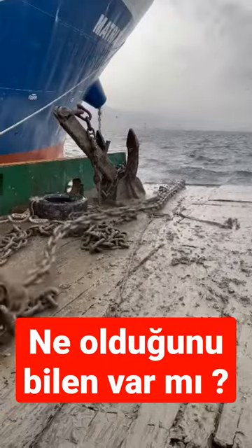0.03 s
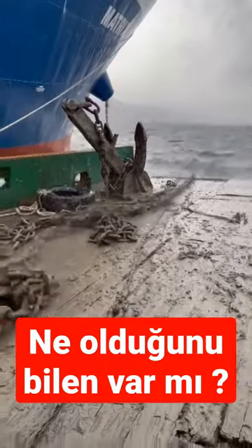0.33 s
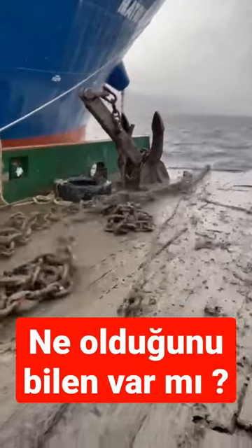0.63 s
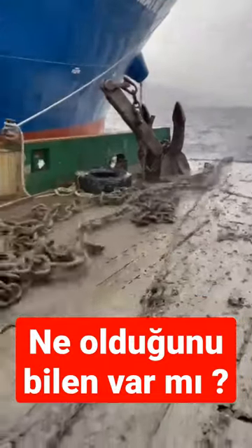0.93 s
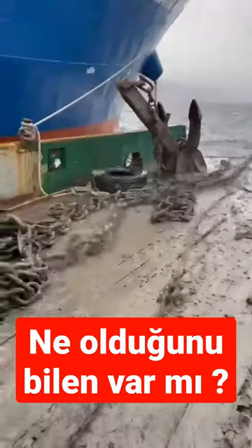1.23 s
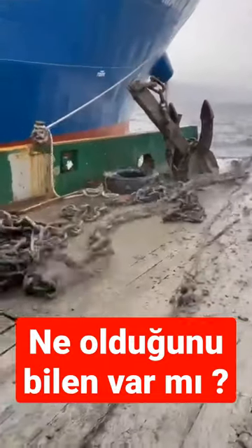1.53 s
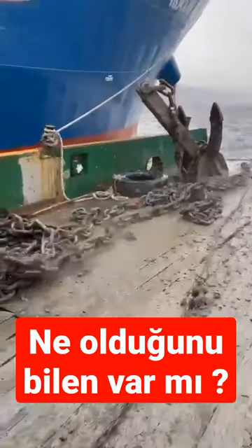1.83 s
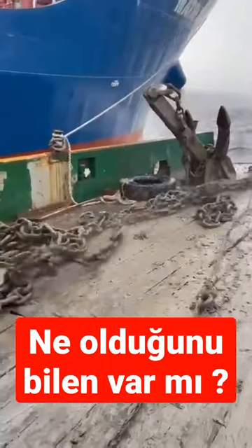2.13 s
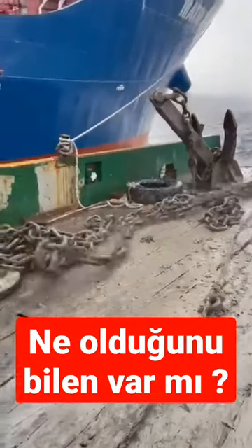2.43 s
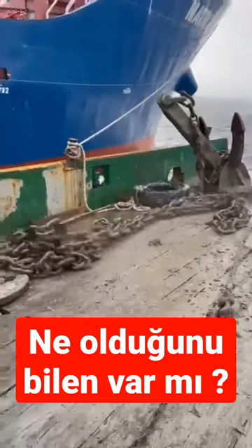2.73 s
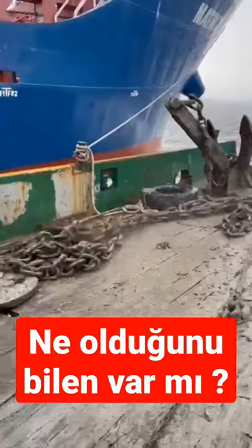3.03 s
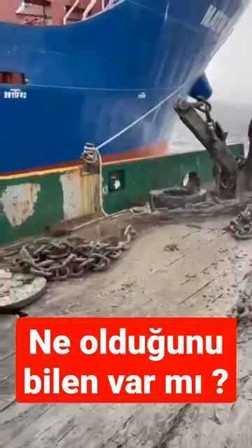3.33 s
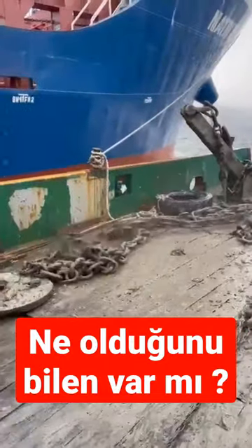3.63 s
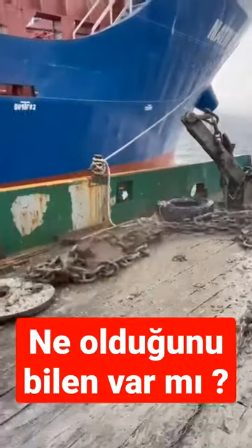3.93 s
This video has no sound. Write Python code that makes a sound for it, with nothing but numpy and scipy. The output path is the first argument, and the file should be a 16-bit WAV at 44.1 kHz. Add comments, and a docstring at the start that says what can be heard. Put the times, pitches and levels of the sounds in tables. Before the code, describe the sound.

Outdoors on a ship's deck, a heavy chain runs out fast a few metres from the microphone. Its links clank and ring without a break, scraping and thumping on wooden boards, with a short echo off a nearby hull.

```python
"""A heavy anchor chain races over a ship's wooden deck and out to sea, a few metres from the microphone.
Hundreds of steel links a second strike each other and ring briefly; loops torn from the heap clash in
bursts, knock on the planks and thud into the deck. The hull alongside throws the rattle back.
Heard on deck, in the open air, through a handheld stereo microphone."""
import sys
import numpy as np
from scipy import signal
from scipy.fft import rfft, irfft, next_fast_len
from scipy.io import wavfile
from scipy.ndimage import uniform_filter1d

SR = 44100
rng = np.random.default_rng(int(sys.argv[2]) if len(sys.argv) > 2 else 0)


def to_wav(s):
    """Save 16-bit WAV."""
    ch = np.atleast_2d(s).T  # columns
    pcm = np.round(np.clip(ch, -1, 1) * 32767)  # PCM
    wavfile.write(sys.argv[1], SR, pcm.astype(np.int16))


N = 176400
START_S = 0.11  # the rattle sets in at once

# Levels in the tables are relative; each source adds its own gain.
# how hard the running chain is shaken: time_s, level_db
SHAKE = [(.107, -9.5), (.15, -22.5), (.22, -22), (.3, -29.5), (.7, -28), (.92, -26), (1.05, -30.5),
         (1.11, -26), (1.21, -28), (1.3, -22.5), (1.6, -24), (2.0, -24), (2.26, -25), (2.33, -28.5),
         (2.42, -25), (2.51, -28), (2.58, -35), (2.65, -25.5), (2.72, -28.5), (2.85, -20), (2.98, -25.5),
         (3.12, -19.5), (3.28, -25), (3.42, -19.5), (3.55, -24), (3.68, -18.5), (3.77, -28), (3.91, -23.5),
         (4, -17)]
# loops of chain clashing together: start_s, level_db
CLASHES = [(0.106, -16), (0.124, -25.5), (0.148, -17), (0.833, -21.5), (1.064, -17.5), (1.131, -23),
           (1.334, -22.5), (1.615, -14), (1.697, -16), (1.844, -18.5), (1.958, -18), (2.061, -19.5),
           (2.15, -19), (2.243, -17), (2.38, -21), (2.599, -21), (2.759, -20), (2.827, -16), (3.036, -17.5),
           (3.344, -16.5), (3.487, -19.5)]
# ring of a struck link: pitch_hz, level_db, t60_s
LINK_MODES = [(1889, -11, 0.061), (2530, 3, 0.13), (2672, 1.5, 0.099), (2990, -13, 0.042), (5318, -9, 0.1),
              (5954, -5.5, 0.077), (6510, -12, 0.11), (6908, -13, 0.12)]
# single links cracking hard: start_s, level_db, pitch_hz (unused)
HARD_CRACKS = [(.124, -9.5, 2600), (.689, -25, 2530), (1.064, -13.5, 2590), (1.081, -14.5, 2600),
               (1.351, -22, 2610), (1.525, -20.5, 2620), (1.632, -9, 2610), (1.697, -15, 2600),
               (1.845, -13, 2520), (2.063, -13, 2670), (2.157, -15.5, 2690), (2.833, -15, 2600),
               (3.018, -14, 2680), (3.151, -16, 2540), (3.386, -12, 2530), (3.815, -11, 2590),
               (3.929, -13, 2520)]
# spectrum of a steel-on-steel crack: frequency_hz, level_db
CRACK_COLOUR = [(300, -16), (1000, 1.5), (1900, 4), (2200, 2.5), (2800, 17), (3500, 0), (4300, -2.5),
                (4900, -8), (5300, -6.5), (7100, -10), (7700, -6.5), (9000, -38), (11500, -46)]
# how hard the links meet, as the gain of their cracks: time_s, gain_db
BITE = [(1.1, -8), (1.65, -12.5), (2.6, -10), (3.45, -7)]
# ring of a link swinging free: pitch_hz, level_db, t60_s
FREE_MODES = [(1948, -11, 0.12), (2615, 9, 0.11), (2796, -2, 0.1), (5900, -7, 0.07)]
# ring of a glancing blow: pitch_hz, level_db, t60_s
GLANCE_MODES = [(3270, -1.5, 0.12), (3828, -9, 0.15), (4333, -6, 0.12)]
# ring of a link caught on its edge: pitch_hz, level_db, t60_s
EDGE_MODES = [(8600, -2.5, 0.096), (11060, -11, .12)]
# weight of chain dragging on the deck: time_s, level_db
DRAG = [(.2, 1.5), (.33, -3.5), (.6, 2), (1.2, 0), (1.55, 2.5), (2.2, 3), (3.0, -0.5), (3.55, 5), (4, 0)]
# lengths of chain falling over a beam: start_s, level_db, pitch_hz
THUDS = [(0.112, -29.5, 101.4), (0.75, -40.5, 123), (1.105, -32, 131), (1.271, -35, 129),
         (1.532, -33.5, 105), (2.025, -32.5, 120), (2.131, -28, 138), (2.433, -30, 118),
         (2.535, -34, 112.5), (2.83, -28.5, 146.4), (3.085, -30.5, 140.6), (3.478, -32, 115)]
# spectrum of the deck's boom: frequency_hz, level_db
DECK_COLOUR = [(35, -41), (52, -11), (80, 2.5), (125, -0.5), (200, -4), (300, -11.5), (900, -48)]
# resonances of the beams under the deck, retuned by each thud: pitch_hz, level_db, t60_s
BEAM_MODES = [(86, -9, 0.18), (140, 4, 0.2)]
# links slapping a board: start_s, level_db, pitch_hz
KNOCKS = [(0.117, -31.5, 399), (0.913, -28, 582), (1.062, -28.5, 406), (1.508, -23.5, 640),
          (1.683, -30, 665), (1.849, -28.5, 625), (2.18, -31, 401), (2.456, -28.5, 487),
          (3.095, -26.5, 528), (3.342, -31.5, 554), (3.812, -26, 556)]
# spectrum of scraped planks: frequency_hz, level_db
PLANK_COLOUR = [(60, -44), (200, -4), (350, 7), (700, 5), (1100, 2), (1800, -2), (3000, -1), (6000, -83.5)]
# resonances of a slapped board, retuned by each knock: pitch_hz, level_db, t60_s
BOARD_MODES = [(366.5, -6, 0.055), (578.3, 0, 0.072), (657.7, -5.5, 0.11), (739.5, -5, 0.11),
               (921, -7.5, 0.11)]
# how alike the microphone's two ports sound: frequency_hz, likeness_0_to_1
MIC_LIKENESS = [(200, 0.93), (650, 0.26), (1100, 0.45), (1850, 0.94), (2600, 0.45), (4600, 0.074),
                (5800, 0.99)]
# balance between the ports: frequency_hz, left_minus_right_db
MIC_BALANCE = [(220, 2.2), (500, 7), (1200, 4), (1900, 2), (4400, -.5)]
# phase between the ports: frequency_hz, left_lead_rad
MIC_PHASE = [(450, 0), (900, -1.1), (2200, .3), (2800, 2.7), (3700, 6.2), (4200, 6.5), (5550, 12.5),
             (7350, 13.1), (7600, 15.7)]


def amp(db):
    """Decibels to gain."""
    return 10 ** (np.asarray(db) / 20)


def along(points, hz):
    """(Hz, value) points read on a log axis."""
    point_hz, values = np.transpose(points)
    return np.interp(np.log(hz + 1), np.log(point_hz + 1), values)


def curve(rows):
    """(s, value) points drawn out to one value per sample."""
    return np.interp(np.arange(N) / SR, *np.transpose(rows))


def filtered(x, response):
    """x shaped by a frequency response."""
    length = x.shape[-1]
    padded = next_fast_len(length + 8192)
    hz = np.fft.rfftfreq(padded, 1 / SR)
    return irfft(rfft(x, padded) * response(hz), padded)[..., :length]


def effort(steady_db, bursts, burst_db, attack_s, hold_s, fall_s):
    """Strength of the contacts: a steady part plus bursts that rise, hold and fall away."""
    t = np.arange(N) / SR
    power = amp(steady_db) ** 2
    age = t[:SR // 3]
    shape = np.minimum(age / attack_s, 1) * np.exp(-np.maximum(age - attack_s - hold_s, 0) / fall_s)
    for start_s, level_db, *_ in bursts:
        span = power[round(start_s * SR):][:len(age)]
        span += (amp(level_db + burst_db) * shape[:len(span)]) ** 2
    return np.sqrt(power) * (t > START_S)


def contacts(per_s, spread_db, even_s):
    """Random impacts of uneven size, their power evened out over spans of about even_s."""
    hits = (rng.random(N) < per_s / SR) * amp(spread_db * rng.standard_normal(N))
    window = max(int(even_s * SR), 1)
    power = uniform_filter1d(uniform_filter1d(hits ** 2, window), window)
    return hits / np.sqrt(np.abs(power) + 1e-9)


def blows(rows):
    """One impact for each row, at its time and level."""
    force = np.zeros(N)
    for start_s, level_db, *_ in rows:
        force[round(start_s * SR)] = amp(level_db)
    return force


def struck(force, make_response, bodies):
    """Each impact falls on one of several bodies, each with its own pair of impulse responses."""
    target = rng.integers(bodies, size=N)
    out = np.zeros((2, N))
    for body in range(bodies):
        response = make_response()
        response /= np.sqrt(np.sum(response ** 2) / 2)
        hits = force * (target == body)
        out += signal.oaconvolve(hits[None], response, axes=1)[:, :N]
    return out


def ringing(modes, scatter, uneven_db):
    """One struck body: decaying modes, each off in pitch (scatter, a fraction) and level by chance."""
    t = np.arange(SR // 5) / SR
    hz, db, t60 = np.transpose(modes)[:, :, None]
    detune, level = rng.standard_normal((2, len(modes), 1))
    phase = rng.uniform(0, 2 * np.pi, (2, len(modes), 1))
    rise = 1 - np.exp(-(t * hz / 0.85) ** 2)  # a mode swells over 0.85 of a cycle
    decay = np.exp(-np.log(1000) * t / t60)
    tones = np.sin(2 * np.pi * hz * (1 + scatter * detune) * t + phase)
    return np.sum(amp(db + uneven_db * level) * rise * decay * tones, axis=1)


def puff(colour, t60_s):
    """A body without clear modes: a dying burst of coloured noise."""
    t = np.arange(SR // 6) / SR
    noise = filtered(rng.standard_normal((2, len(t))), lambda hz: amp(along(colour, hz)))
    rise = 1 - np.exp(-t / (0.035 * t60_s))
    return noise * rise * np.exp(-np.log(1000) * t / t60_s)


def tuned_strikes(rows, modes, decay_scale, uneven_db):
    """One ringing blow a row, tuned so that the body's main mode lies at the row's pitch."""
    out = np.zeros((2, N))
    main_hz = max(modes, key=lambda mode: mode[1])[0]
    for start_s, level_db, pitch_hz in rows:
        tuned = np.array(modes) * [pitch_hz / main_hz, 1, decay_scale]
        ring = ringing(tuned, 0, uneven_db)
        span = out[:, round(start_s * SR):][:, :ring.shape[1]]
        span += amp(level_db) * ring[:, :span.shape[1]] / np.abs(ring).max()
    return out


def links():
    """Steel on steel: contacts crack and ring the links; some swing free, glance off or catch an edge."""
    strength = effort(curve(SHAKE), CLASHES, burst_db=-1.5, attack_s=0.0012, hold_s=0.012, fall_s=0.02)
    force = contacts(per_s=260, spread_db=1.5, even_s=0.0074) * strength + amp(21) * blows(CLASHES)
    ring = struck(force, lambda: ringing(LINK_MODES, scatter=0.02387, uneven_db=3.5), bodies=72)
    crack_force = force + amp(21.5) * blows(HARD_CRACKS)
    crack = struck(crack_force, lambda: puff(CRACK_COLOUR, t60_s=0.042), bodies=24)
    swings = contacts(per_s=61, spread_db=4, even_s=0.11) * strength
    free = struck(swings, lambda: ringing(FREE_MODES, scatter=0.0402, uneven_db=5), bodies=36)
    glances = contacts(per_s=90, spread_db=3, even_s=0.15) * strength
    clink = struck(glances, lambda: ringing(GLANCE_MODES, scatter=0.07, uneven_db=4), bodies=40)
    edges = contacts(per_s=30, spread_db=6, even_s=0.99) * strength
    chink = struck(edges, lambda: ringing(EDGE_MODES, scatter=0.06, uneven_db=8.5), bodies=12)
    rattle = amp(-2) * ring + amp(curve(BITE)) * crack
    return rattle + amp(-9) * free + amp(-16) * clink + amp(-21) * chink


def deck():
    """The deck booms under the weight of the chain; falling lengths set its beams ringing."""
    weight = effort(curve(DRAG) - 40, THUDS, burst_db=-2.5, attack_s=0.009, hold_s=0.0079, fall_s=0.034)
    force = contacts(per_s=200, spread_db=4, even_s=0.025) * weight
    boom = struck(force, lambda: puff(DECK_COLOUR, t60_s=0.15), bodies=20)
    thud = tuned_strikes(THUDS, BEAM_MODES, decay_scale=0.74, uneven_db=2.5)
    return boom + amp(1.5) * thud


def planks():
    """Links scrape and patter over the boards; a hard slap makes one board clunk at its own pitch."""
    slaps = effort(curve(DRAG) - 39.5, KNOCKS, burst_db=-7, attack_s=0.0024, hold_s=0.028, fall_s=0.029)
    force = contacts(per_s=400, spread_db=3, even_s=0.028) * slaps
    scrape = struck(force, lambda: puff(PLANK_COLOUR, t60_s=0.05), bodies=18)
    patter = struck(force, lambda: ringing(BOARD_MODES, scatter=0.1407, uneven_db=4), bodies=32)
    clunk = tuned_strikes(KNOCKS, BOARD_MODES, decay_scale=1, uneven_db=0.5)
    return amp(-2) * scrape + amp(-8) * patter + amp(3) * clunk


def hull_echo(x, delay_s, t60_s):
    """The steel side of the ship, a few metres off, returns a short scattered echo."""
    t = np.arange(SR // 2) / SR
    tail = rng.standard_normal((2, len(t))) * np.exp(-np.log(1000) * t / t60_s) * (t > delay_s)
    return signal.fftconvolve(x, tail / np.linalg.norm(tail[0]), axes=1)[:, :N]


def microphone(pair):
    """A shared and an unshared sound reach the two ports with different level and phase."""
    def blend(hz):
        angle = np.arccos(np.clip(along(MIC_LIKENESS, hz), 0, 1)) / 2
        return np.array([np.cos(angle), np.sin(angle)])

    def level_and_phase(hz):
        side = np.array([[0.5], [-0.5]])  # left, right
        return amp(side * along(MIC_BALANCE, hz)) * np.exp(1j * side * along(MIC_PHASE, hz))

    shared, apart = filtered(pair, blend)
    return filtered(np.array([shared + apart, shared - apart]), level_and_phase)


def scene():
    """Chain, planks and deck with the hull's echo, heard from a few metres away."""
    chain = links() + planks() + deck()
    return microphone(chain + amp(-13.5) * hull_echo(chain, delay_s=0.022, t60_s=0.43))


def record(dry):
    """The handheld recorder keeps nothing above 11.6 kHz."""
    return filtered(dry, lambda hz: hz < 11600)


dry = scene()
out = record(dry)
to_wav(out)
```